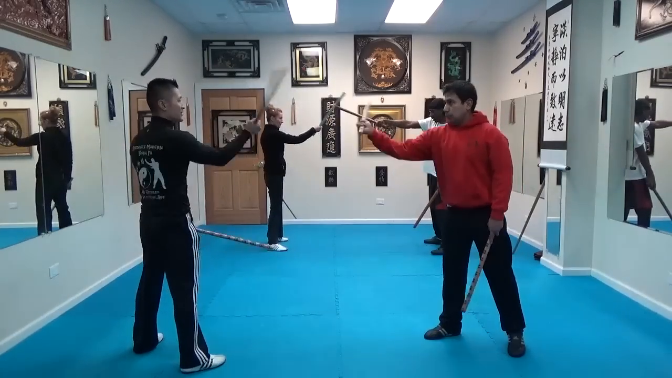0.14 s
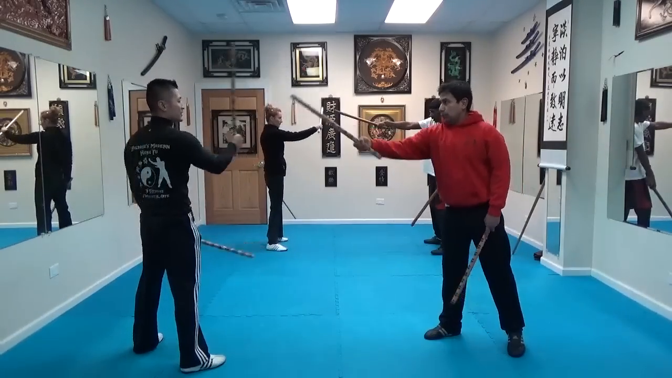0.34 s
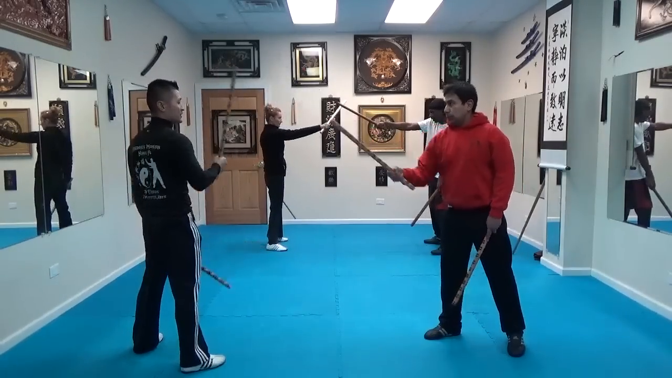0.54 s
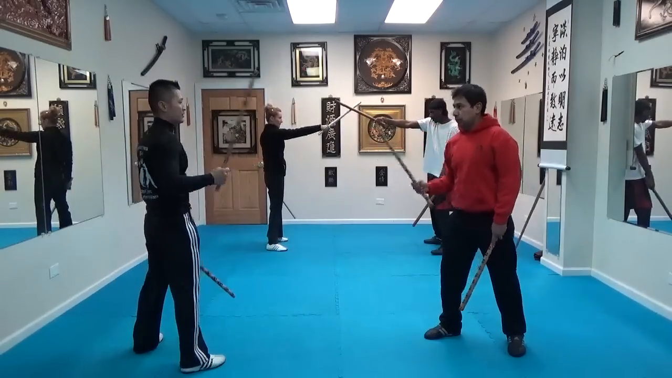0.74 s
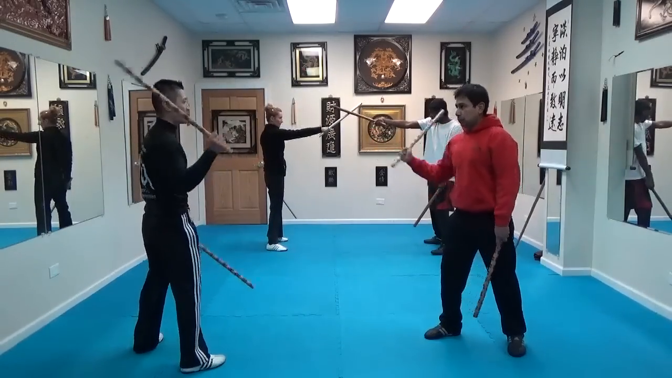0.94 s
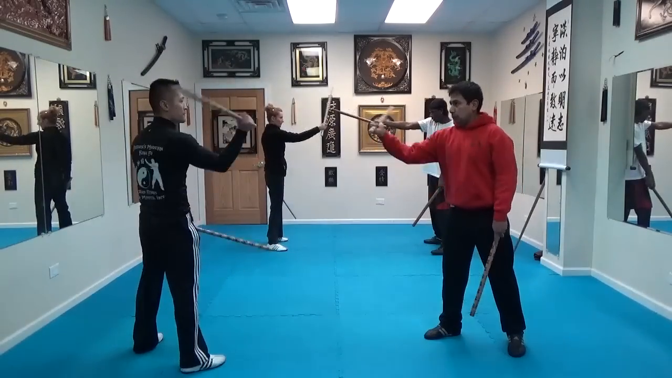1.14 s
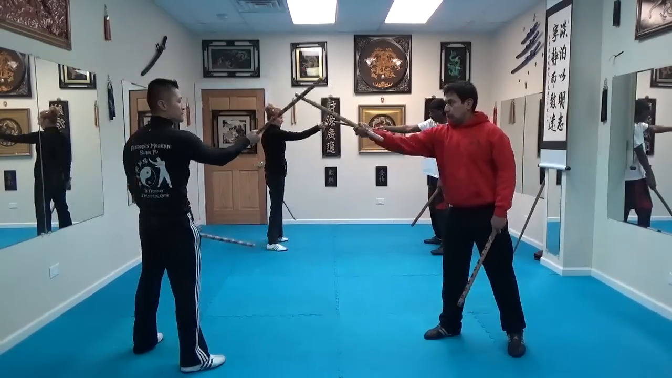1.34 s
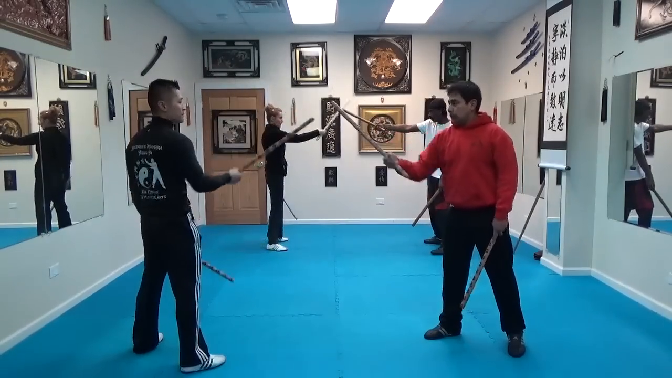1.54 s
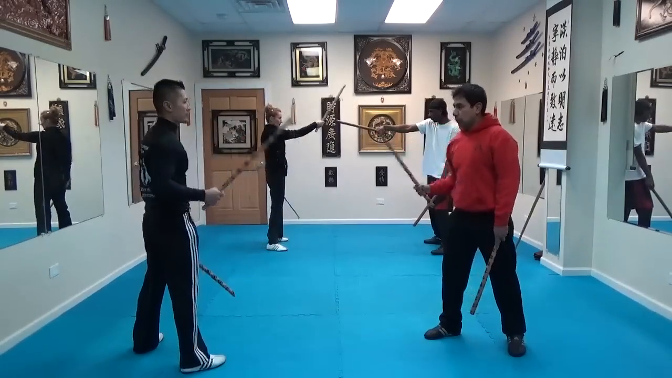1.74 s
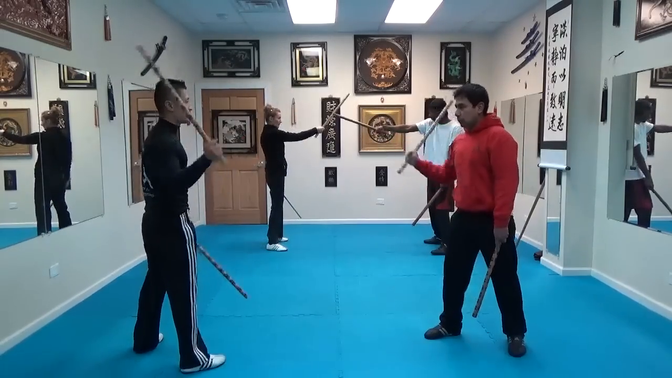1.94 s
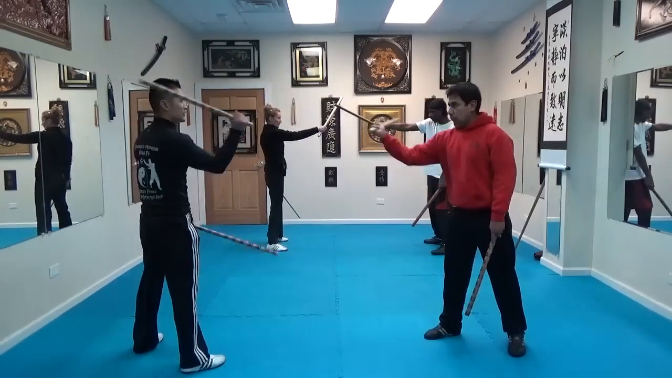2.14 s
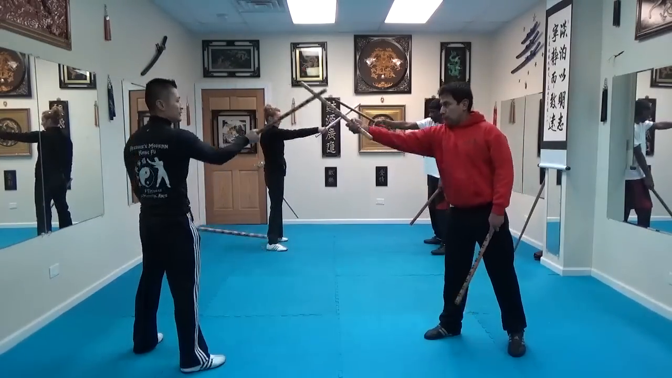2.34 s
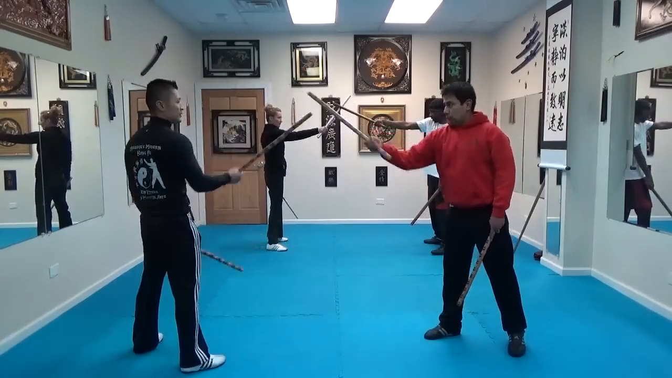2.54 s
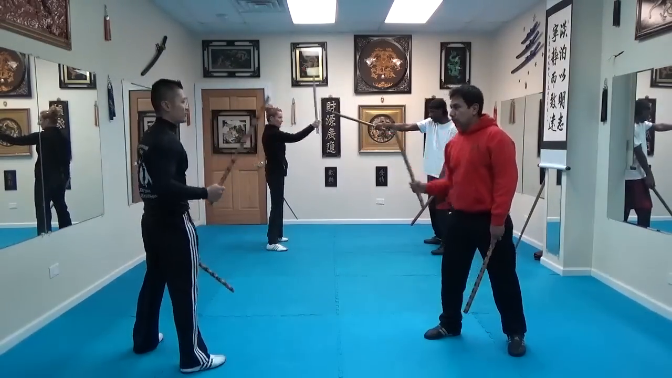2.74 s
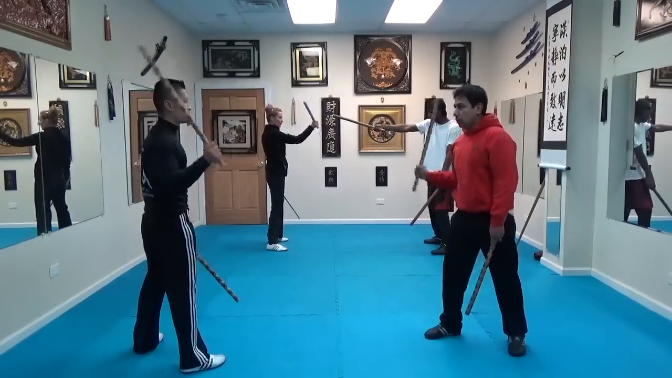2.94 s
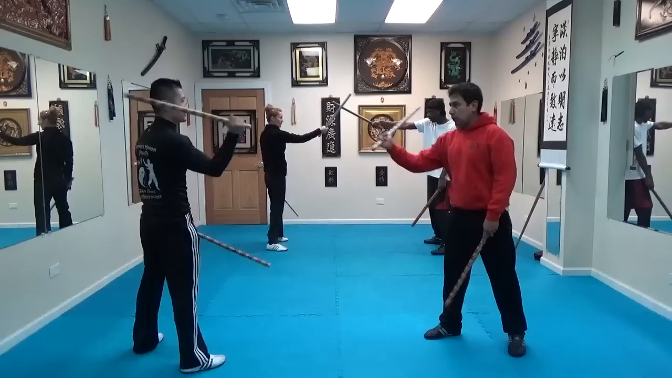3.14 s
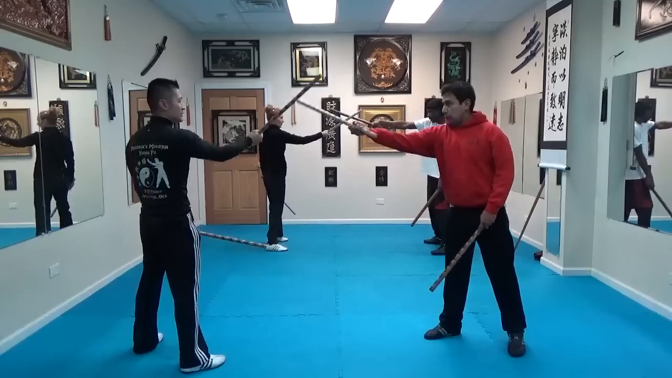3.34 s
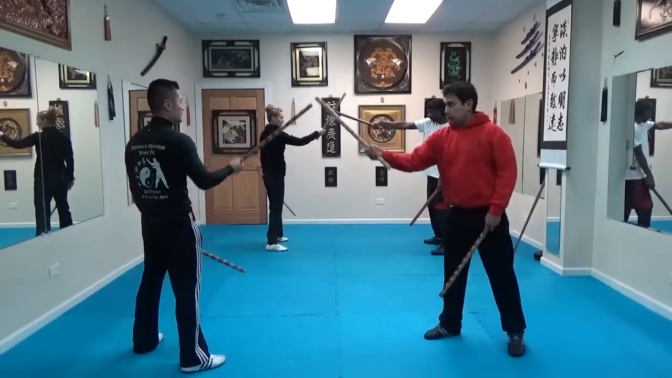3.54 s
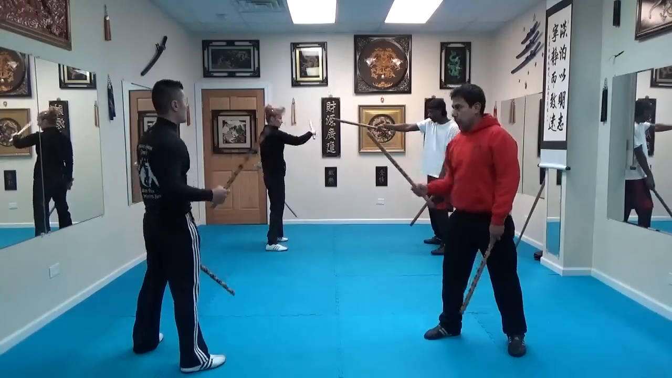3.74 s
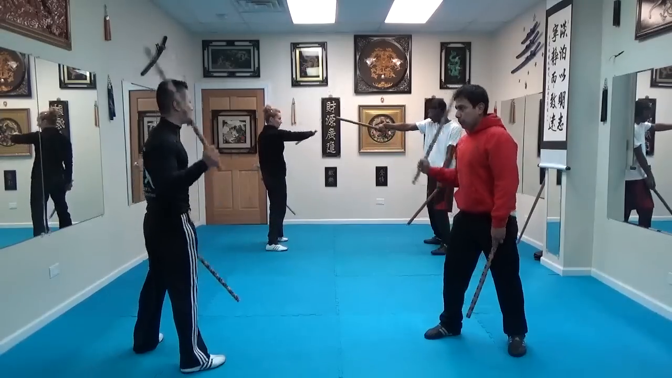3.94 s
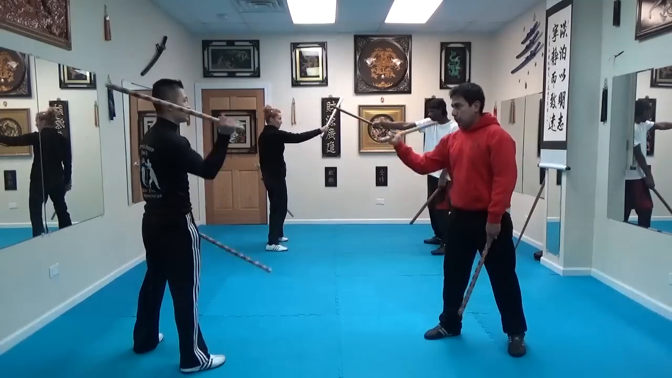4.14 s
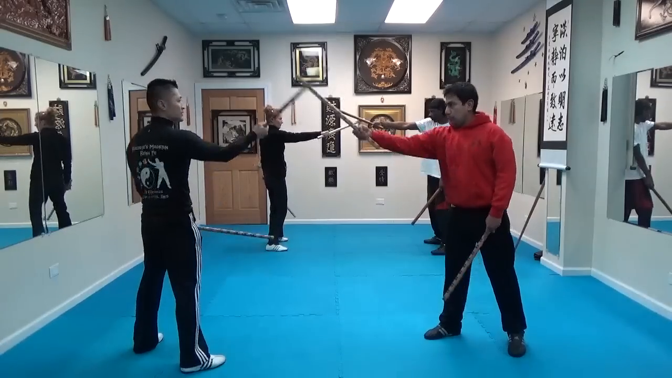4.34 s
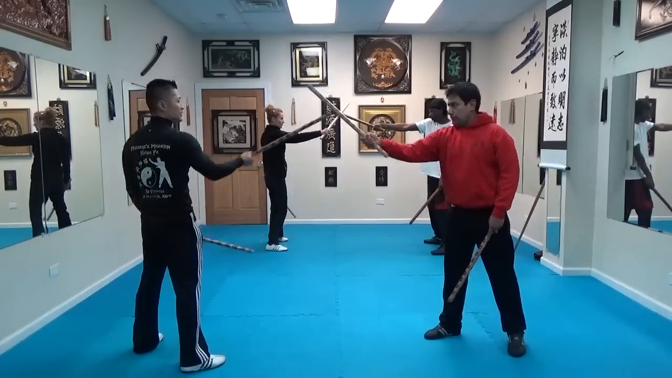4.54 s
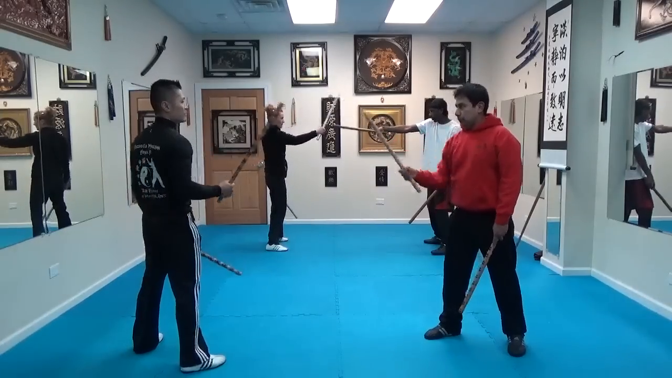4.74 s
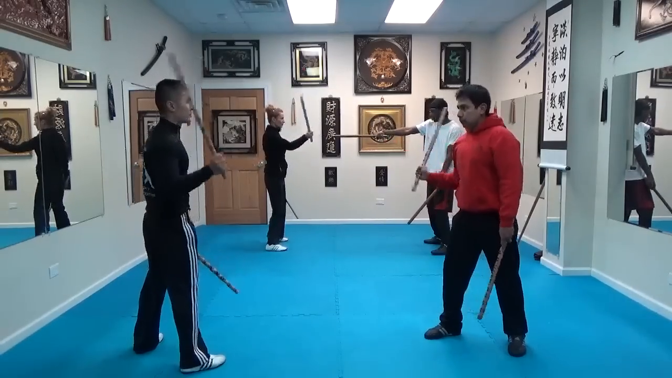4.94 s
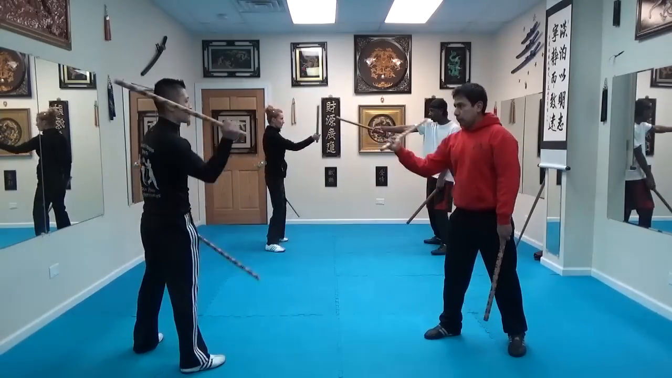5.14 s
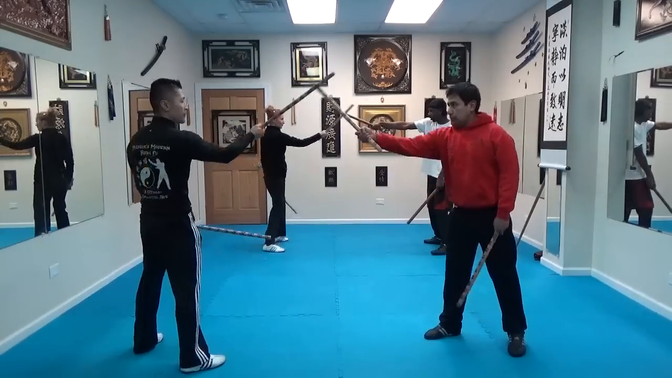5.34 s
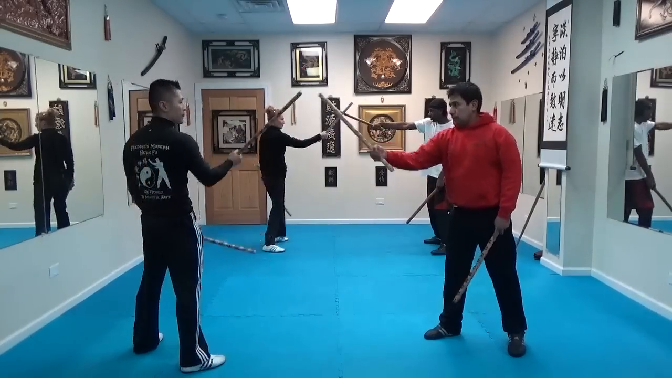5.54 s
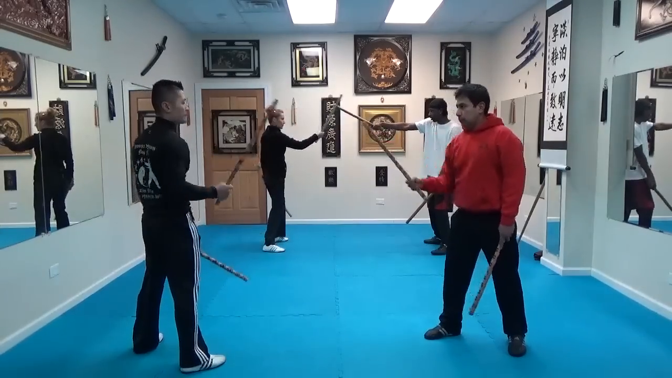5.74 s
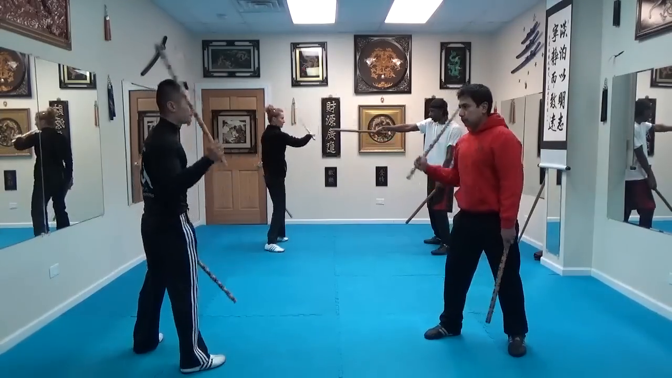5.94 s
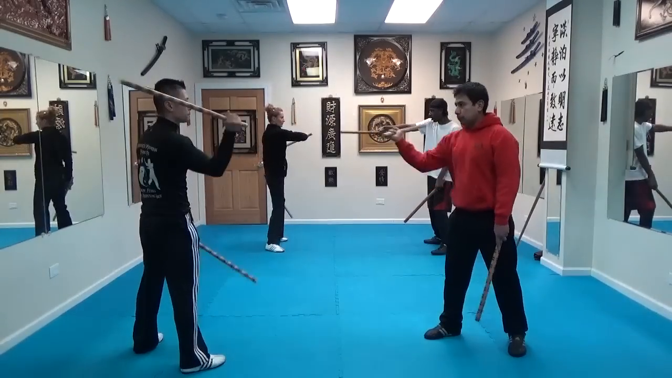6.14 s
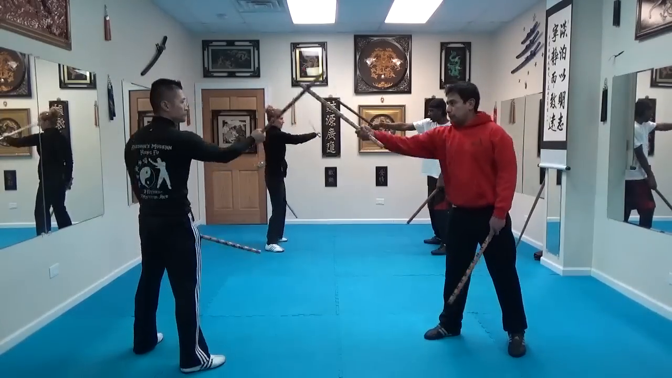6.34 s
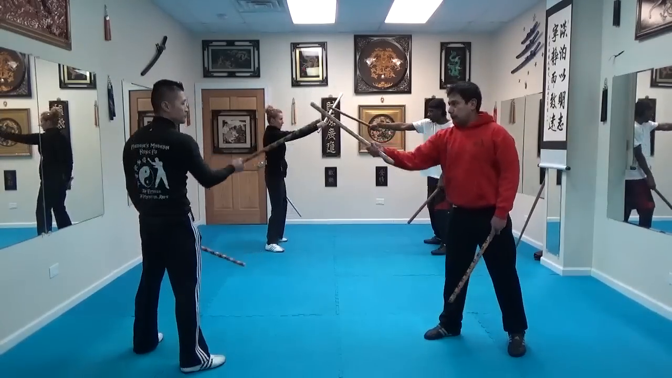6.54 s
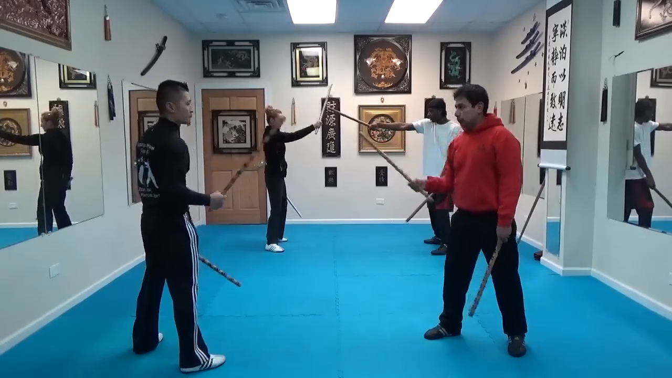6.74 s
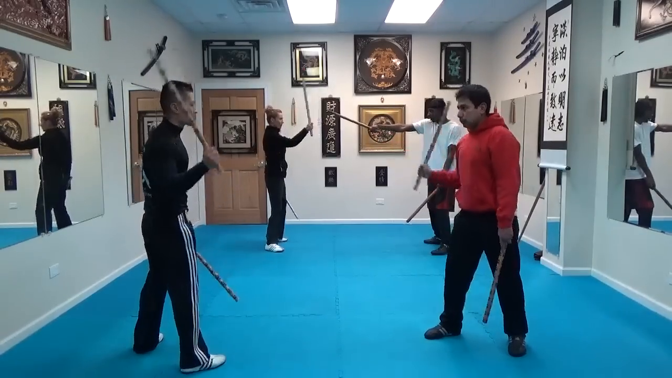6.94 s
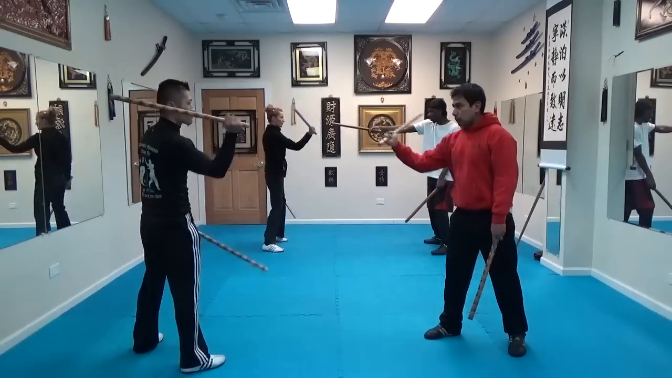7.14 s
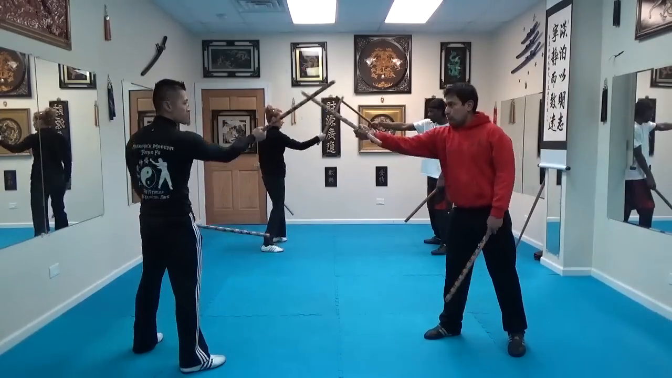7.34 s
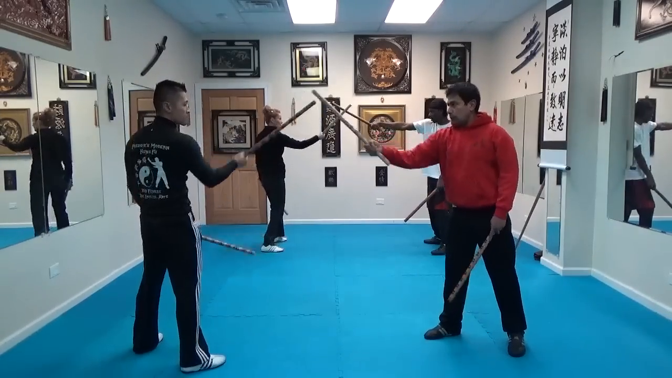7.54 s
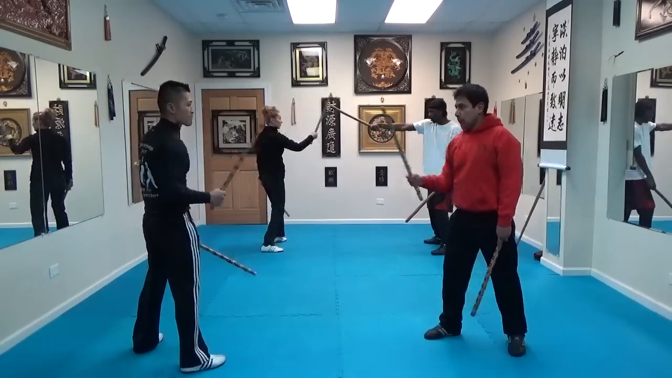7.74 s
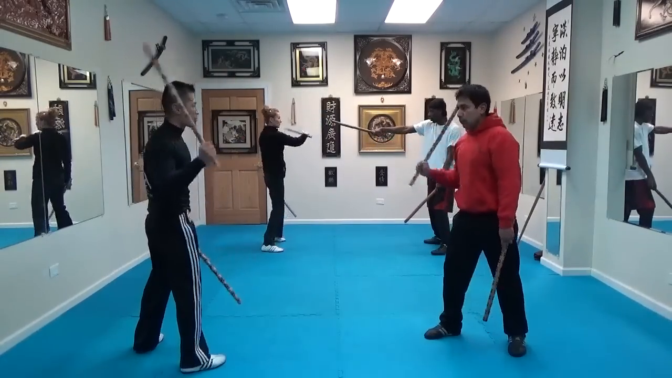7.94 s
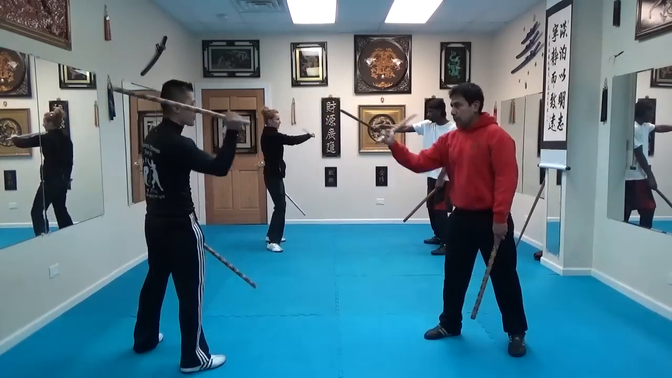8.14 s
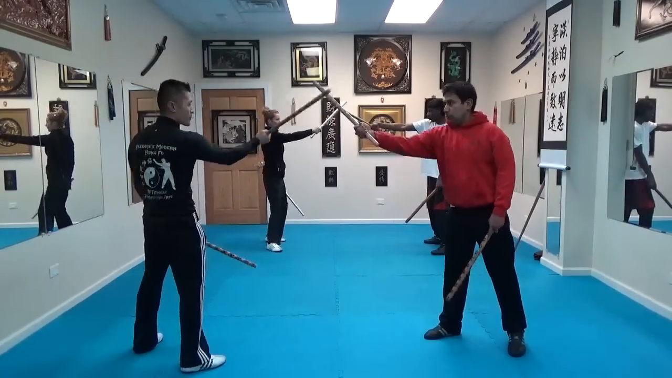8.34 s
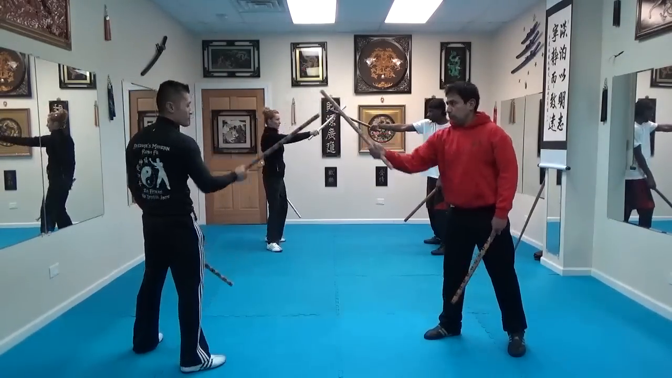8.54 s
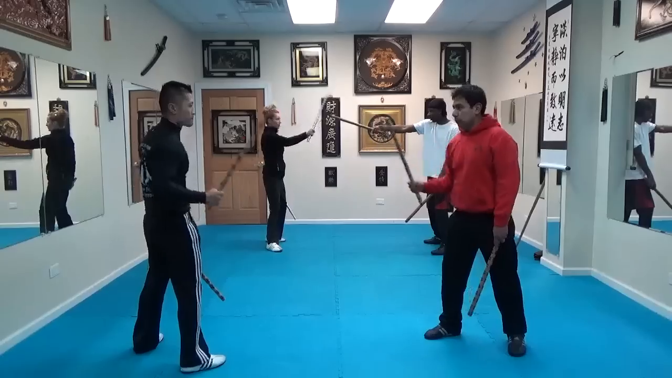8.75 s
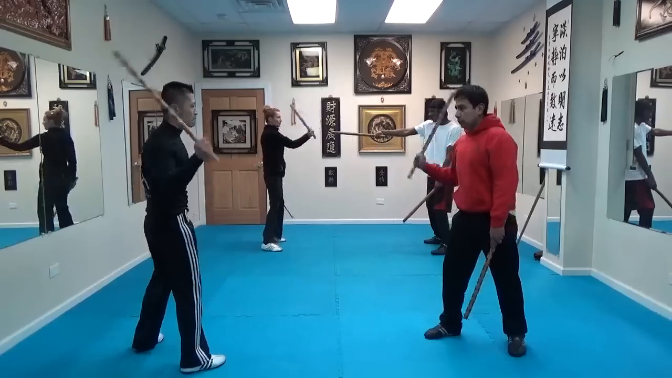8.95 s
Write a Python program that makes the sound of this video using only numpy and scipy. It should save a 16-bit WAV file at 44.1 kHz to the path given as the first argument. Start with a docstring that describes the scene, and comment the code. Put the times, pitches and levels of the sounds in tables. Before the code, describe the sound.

Wooden sticks clack sharply about once a second close by, with fainter clacks from a second pair behind, ringing in a hard-walled echoing studio.

```python
"""A hard-walled studio with a mat: two pairs drill with wooden sticks, one near the two microphones, one at the back.
Each clack is a click ringing the sticks' bending modes, heard direct, off the walls and in a dense tail.
Between blows, shaped noise gives swishing sleeves and soft footfalls over faint moving air and hum tones.
The narrow-band recorder's limiter holds down the loud start of each clack, then lets the echo die."""
import sys
import numpy as np
from scipy import signal
from scipy.fft import rfft, irfft
from scipy.io import wavfile
from scipy.ndimage import uniform_filter1d, minimum_filter1d

SR = 44100
rng = np.random.default_rng(int(sys.argv[2]) if len(sys.argv) > 2 else 0)


def persist_wave(psi):
    """Save psi, clipped to +-1, as 16-bit WAV."""
    counts = np.round(np.clip(psi, -1, 1) * 32767).astype(np.int16)
    wavfile.write(sys.argv[1], SR, np.atleast_2d(counts).T)


N = 397341


def amp(db):
    """Decibels to gain."""
    return 10 ** (np.asarray(db) / 20)


def unit(x):
    """Scales to rms 1."""
    return x / np.sqrt(np.mean(x ** 2) + 1e-20)


def read(points, hz):
    """Reads a table on a log-frequency axis."""
    table_hz, value = np.transpose(points)
    return np.interp(np.log(hz + 1), np.log(table_hz + 1), value)


def add(mix, time_s, sound):
    """Adds a stereo sound at a time; what comes before time zero is dropped."""
    start = round(time_s * SR)
    sound = sound[:, max(-start, 0):]
    part = mix[:, max(start, 0):][:, :sound.shape[1]]
    part += sound[:, :part.shape[1]]


def drift(knots_per_s):
    """Slow random wander around zero: straight lines between random knots of rms 1."""
    knots = rng.standard_normal(4096)
    return np.interp(np.arange(N) / SR * knots_per_s, np.arange(len(knots)), knots)


# likeness of the two close microphones in sound from all sides: (frequency [Hz], correlation [-1..1])
MICROPHONE_LIKENESS = [(100, .93), (300, .87), (600, 0.88), (1200, 0.69), (2600, .71), (5500, 0.68),
                       (9000, 0.82)]


def diffuse(size):
    """White noise from all sides: the close microphones share a middle part and differ by a side part."""
    a, b = rfft(rng.standard_normal((2, size)))
    same = np.clip(read(MICROPHONE_LIKENESS, np.fft.rfftfreq(size, 1 / SR)), 0, 1)
    mid = a * np.sqrt((1 + same) / 2)
    side = b * np.sqrt((1 - same) / 2)
    return irfft(np.array([mid + side, mid - side]), size)


def noise(spectrum, size):
    """Diffuse noise with a given relative spectrum, rms 1."""
    gain = amp(read(spectrum, np.fft.rfftfreq(size, 1 / SR)))
    return unit(irfft(rfft(diffuse(size)) * gain, size))


# spectrum of the moving air: (frequency [Hz], relative level [dB])
AIR_SPECTRUM = [(25, -25), (60, -15.5), (110, 0), (200, -2), (320, -3.5), (550, -0.5), (1100, -1),
                (1600, -5.5), (3000, -8), (6200, -14.5), (11000, -13.5)]
AIR_DB = -62  # rms level
# two fan tones and a thin electrical whine: (frequency [Hz], rms level [dB] before the waver)
HUM_TONES = [(177.6, -79), (241.5, -73), (7960, -86)]


def ventilation(waver_hz=2.3, waver_db=2):
    """Moving air is steady shaped noise; each faint tone wavers in pitch and level."""
    tones = np.zeros(N)
    for hz, db in HUM_TONES:
        level = amp(db + waver_db * drift(2.5))
        phase = 2 * np.pi * np.cumsum(hz + waver_hz * drift(15)) / SR
        tones += level * np.sin(phase)
    return amp(AIR_DB) * noise(AIR_SPECTRUM, N) + np.sqrt(2) * tones  # peak from rms


# spectrum of a foot on the mat: (frequency [Hz], relative level [dB])
MAT_SPECTRUM = [(50, -18), (150, -1), (260, -1), (430, 7.5), (650, -13), (2000, -48), (8000, -51)]
# soft footfalls on the mat: (time [s], level [dB] before the doubling and envelope below)
FOOTFALLS = [(2.727, -56), (2.791, -63), (8.21, -64), (8.73, -61)]


def feet(rise_s=0.01, fade_s=0.041):
    """Dull footfalls: mat noise with a soft rise and a fade blurred by the room."""
    out = np.zeros((2, N))
    t = np.arange(SR // 2) / SR
    envelope = 2 * (1 - np.exp(-t / rise_s)) * np.exp(-t / fade_s)
    for time_s, db in FOOTFALLS:
        add(out, time_s, amp(db) * noise(MAT_SPECTRUM, len(t)) * envelope)
    return out


# spectrum of rubbing cloth: (frequency [Hz], relative level [dB])
CLOTH_SPECTRUM = [(200, -11), (600, -3), (1500, -3.5), (3000, -4.5), (5000, -5), (6400, -13.5), (8000, -7),
                  (11000, -5.5)]
# sleeves swishing with the swings: (time of the swell's peak [s], level [dB] before the flutter)
SLEEVE_SWISHES = [(0.204, -46.5), (1.147, -50), (2.66, -56), (5.035, -55), (5.345, -52), (5.803, -56.5),
                  (6.0, -55.5), (6.19, -54.5), (7.15, -62.5), (7.27, -56.5), (7.772, -58), (7.95, -59.5),
                  (8.162, -56.5), (8.735, -59.5), (8.89, -59)]
SWISH_WIDTH_S = .052  # standard deviation of the bell-shaped swell, the same for every swing


def sleeves(flutter_db=1.5):
    """Cloth rubs in a fluttering swell with each swing."""
    t = np.arange(N) / SR
    swell = np.zeros(N)
    for time_s, db in SLEEVE_SWISHES:
        swell += amp(db) * np.exp(-.5 * ((t - time_s) / SWISH_WIDTH_S) ** 2)
    return noise(CLOTH_SPECTRUM, N) * swell * amp(flutter_db * drift(61))


# decay of the studio's tail by 60 dB: (frequency [Hz], time [s])
ROOM_DECAY = [(120, 0.38), (300, 0.66), (600, 0.7), (1100, 0.64), (2000, 0.53), (3500, 0.47), (5500, 0.39),
              (8000, 0.38), (11000, 0.35)]
SHARPNESS = .9  # treble lift of the short paths


def studio(direct_db, early_db, build_s, count=8):
    """The path from one spot to the microphones: direct sound, a few wall echoes, then a dense tail."""
    hz, t, bands = signal.stft(diffuse(SR), SR, nperseg=256)
    decay = amp(-60 * t / read(ROOM_DECAY, hz)[:, None])
    tail = signal.istft(bands * decay, SR, nperseg=256)[1][:, :SR]
    tail *= 1 - np.exp(-np.arange(SR) / SR / build_s)
    rays = np.zeros((2, SR))
    rays[:, 0] = amp(direct_db)
    delays_s = rng.uniform(.004, 0.032, count)
    lags = rng.integers(-1, 2, count)  # samples between the microphones
    for delay_s, lag in zip(delays_s, lags):
        at = round(delay_s * SR)
        rays[[0, 1], [at, at + lag]] += amp(early_db) * np.exp(-delay_s / 0.032)
    rays = rays + SHARPNESS * np.diff(rays, prepend=0)  # short paths keep more treble than the tail
    return rays + tail / np.linalg.norm(tail[0])


# how much of a blow's body, knock and crack reaches each part of its spectrum: (frequency [Hz], share [0..1])
BODY_REACH = [(700, 0.95), (1170, 0.049)]
KNOCK_REACH = [(700, 0), (1170, 0.97), (1900, 0)]
CRACK_REACH = [(3300, 0), (7500, 1)]
SCATTER_DB = .7  # chance in each mode's height from blow to blow
REBOUND = .25  # size of the second touch against the first


def clack(contact, modes, spot, body_db, knock_db, crack_db, size=4096):
    """One blow: a click rings the bending modes, each by an amount that depends on where the sticks meet."""
    hz = np.fft.rfftfreq(size, 1 / SR)
    db = read(contact, hz)
    db = db + body_db * read(BODY_REACH, hz)
    db = db + knock_db * read(KNOCK_REACH, hz)
    db = db + crack_db * read(CRACK_REACH, hz)
    for (mode_hz, width_hz, mode_db, spot_db), luck in zip(modes, rng.standard_normal(len(modes))):
        height = amp(mode_db + spot * spot_db + SCATTER_DB * luck) ** 2 - 1
        resonance = 1 / (1 + (2 * (hz - mode_hz) / width_hz) ** 2)
        db = db + 10 * np.log10(1 + height * resonance)
    log_gain = np.log(amp(np.r_[db, db[-2:0:-1]]))
    # minimum phase: it rings only after contact
    wave = np.fft.ifft(np.exp(np.conj(signal.hilbert(log_gain)))).real
    gap = round(rng.uniform(.002, .0045) * SR)  # the flexing sticks touch again a few ms later
    wave = np.pad(wave, (0, gap)) + REBOUND * np.pad(wave, (gap, 0))
    return wave / np.linalg.norm(wave)


def sticks(blows, contact, modes, direct_db, early_db, build_s):
    """One pair's blows; the sticks meet at a new place each time, so every blow has its own echoes."""
    out = np.zeros((2, N))
    for time_s, db, spot, body_db, knock_db, crack_db in blows:
        blow = clack(contact, modes, spot, body_db, knock_db, crack_db)
        path = studio(direct_db, early_db, build_s)
        add(out, time_s, amp(db) * signal.fftconvolve(path, blow[None], axes=1))
    return out


# blows at the back of the room; a blow before time zero leaves only its echo:
# (time [s], strength [dB], spot along the stick [-1..1], body [dB], knock [dB], crack [dB])
BACK_PAIR_BLOWS = [(-.2, 22.6, -.3, 4, 5.5, 2), (.6523, 24.9, -0.31, 4.5, 2, 2.5),
                   (1.5963, 21.8, 0.55, -2.5, 1, 1), (2.2704, 21.5, 0.65, 3.5, 2.5, 3),
                   (3.197, 24, 0.84, 4, -4, 2.5), (3.2766, 17, 0.011, 2.5, 1, 4),
                   (4.2174, 24.1, 0.14, 1.5, -1, 3.5), (4.318, 14.7, 0.27, -4.5, 0.5, 1),
                   (5.3496, 17.8, -0.23, 7.5, 1.5, 8), (6.506, 22.3, .1, 4.5, -3, 3),
                   (6.6315, 16.8, -0.6, 0, 1, 1.5), (7.4236, 25.4, -.85, -4.5, -9.5, 0.5),
                   (7.5132, 15.4, -1, 0, -2, 2), (8.41, 15.7, .2, 4, -4.5, 1)]
# spectrum of the far sticks' contact: (frequency [Hz], relative level [dB])
BACK_PAIR_CONTACT = [(60, -36), (180, -37), (330, -25), (480, -16), (620, -7), (980, -4), (1400, 2.5),
                     (2000, 2.5), (3000, 1.5), (4400, -2.5), (6400, -16), (7600, -10.5), (9000, -10.5),
                     (11000, -9.5)]
# bending modes of the far sticks, damped by the hand:
# (frequency [Hz], width [Hz], height above contact spectrum [dB], gain per unit of spot [dB])
BACK_PAIR_MODES = [(243.4, 9.7, 19.6, 0), (661, 45, 7.6, 3), (837, 50, 4.5, -9.5), (1180, 76, 5.5, 5),
                   (1535, 70, 4.1, -7.5), (1940, 79, 4.6, 1.5), (2710, 200, 2.6, -5.5)]


def back_pair():
    """Far from the microphones: direct sound is weaker against the room's tail."""
    return sticks(BACK_PAIR_BLOWS, BACK_PAIR_CONTACT, BACK_PAIR_MODES,
                  direct_db=-18, early_db=-16, build_s=0.0005)  # dB re tail, before the treble lift


# blows close by; flat, firm meetings have more body and knock, hard glancing ones more crack:
# (time [s], strength [dB], spot along the stick [about -1..1], body [dB], knock [dB], crack [dB])
NEAR_PAIR_BLOWS = [(.2633, 30, -1.04, -6, -4, -1), (1.3096, 25, -0.29, -3.5, 0.5, -0.5),
                   (1.337, 27.5, -0.6, -3.5, -2, -2.5), (2.336, 30.5, 0.36, -0.5, -1.5, -1),
                   (3.3614, 31, 0.031, -3, -1, -0.5), (4.403, 29.5, -0.29, -1.5, 4, -0.5),
                   (5.397, 29, -0.1, -1, -2, 2.5), (5.424, 25.5, -.8, 2.5, 1.5, 1.5),
                   (6.3805, 30.5, -0.15, -5, -3.5, 0), (7.3843, 29, 0.34, -0.5, 0.5, 5),
                   (8.3663, 30, -0.2, 3.5, 3, 2.5)]
# spectrum of the near sticks' contact: (frequency [Hz], relative level [dB])
NEAR_PAIR_CONTACT = [(60, -37.5), (200, -40.5), (330, -28.5), (480, -26), (640, -18), (950, -17),
                     (1500, -8), (2300, -2.5), (3200, -1.5), (4200, -4), (5200, -12.5), (6200, -23),
                     (8000, -21), (11000, -20)]
# bending modes of the near sticks, damped by the hand:
# (frequency [Hz], width [Hz], height above contact spectrum [dB], gain per unit of spot [dB])
NEAR_PAIR_MODES = [(616, 53, 5, -1), (1143, 65, 8, 1), (1725, 65, 8.5, 1.5), (1956, 46, 1, -2),
                   (2440, 59, 3, -0.5), (3073, 170, 5, 1), (3920, 300, 1, -5.5), (4785, 170, 7.5, 6.5),
                   (5560, 360, 7.5, 0), (7300, 200, 4, -3.5)]


def near_pair():
    """Close to the microphones: direct sound and wall echoes stand higher against the room's tail."""
    return sticks(NEAR_PAIR_BLOWS, NEAR_PAIR_CONTACT, NEAR_PAIR_MODES,
                  direct_db=-13.5, early_db=-14.5, build_s=0.00043)  # dB re tail, before the treble lift


def scene():
    """The ventilation, feet, sleeves and both pairs' blows, all sounding together."""
    return ventilation() + feet() + sleeves() + back_pair() + near_pair()


def limiter(x, ceiling_db=-15.0, release_db_per_s=300, size=111):
    """Watches the power a few ms ahead, ducks what passes the ceiling and recovers quickly."""
    power = abs(uniform_filter1d((x ** 2).mean(0), size))
    over_db = np.maximum(10 * np.log10(power + 1e-12) - ceiling_db, 0)
    fall_db = np.arange(N) / SR * release_db_per_s
    held_db = np.maximum.accumulate(over_db + fall_db) - fall_db  # ducking eases off at the release rate
    ahead_db = -minimum_filter1d(-held_db, size, origin=-(size // 2))
    return x * amp(-uniform_filter1d(ahead_db, size, origin=size // 2))


EDGE_HZ = 11130  # upper edge of the recorder's band


def record(dry):
    """A narrow-band recorder: the treble is cut before and after its limiter."""
    band = signal.firwin(511, EDGE_HZ, window=("kaiser", 8), fs=SR)[None]
    limited = limiter(signal.oaconvolve(dry, band, "same", axes=1))
    return signal.oaconvolve(limited, band, "same", axes=1)


dry = scene()
out = record(dry)
persist_wave(out)
```